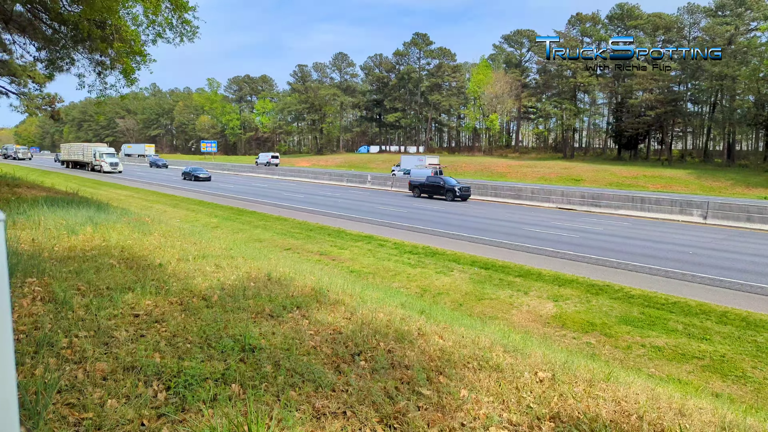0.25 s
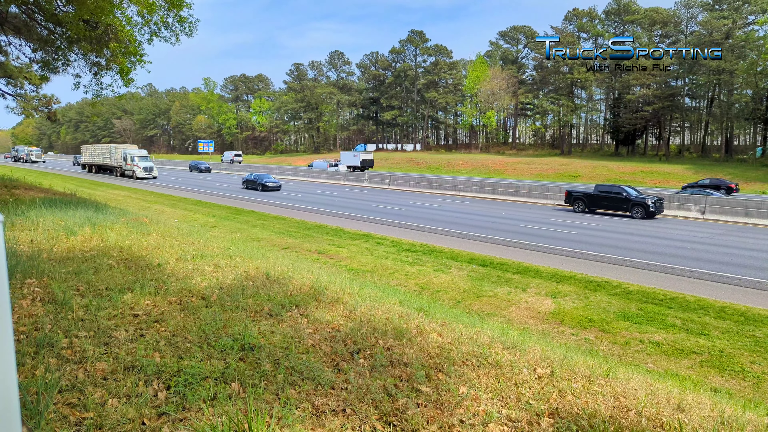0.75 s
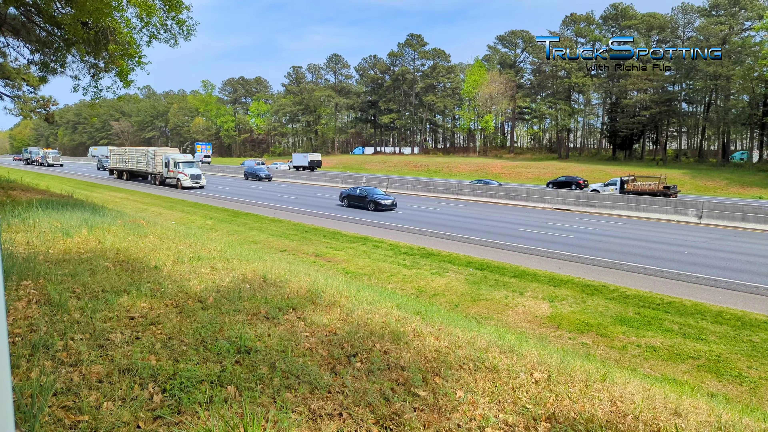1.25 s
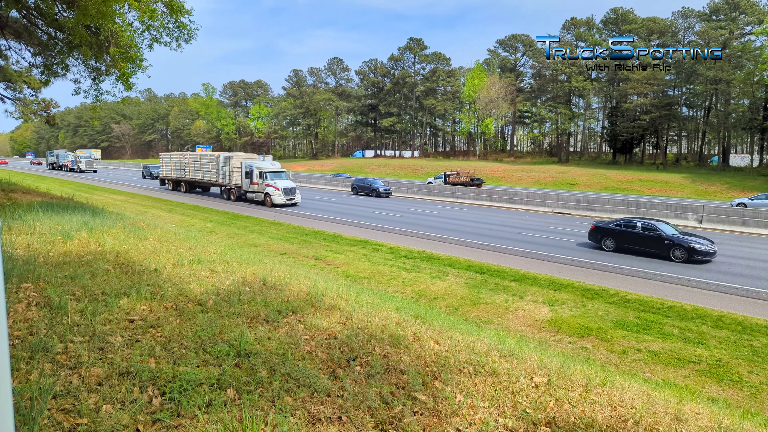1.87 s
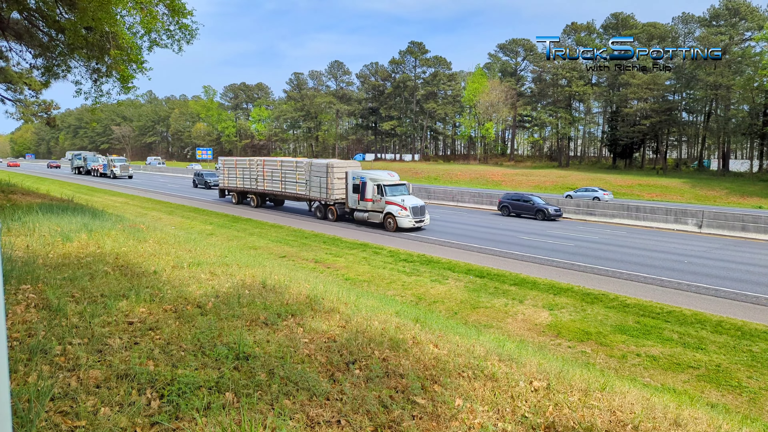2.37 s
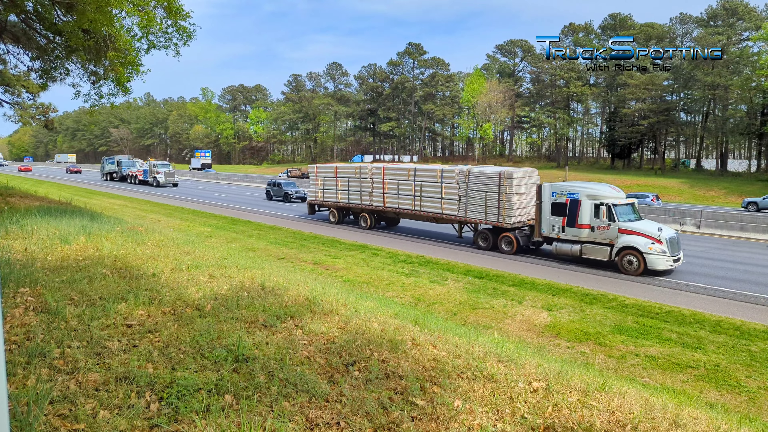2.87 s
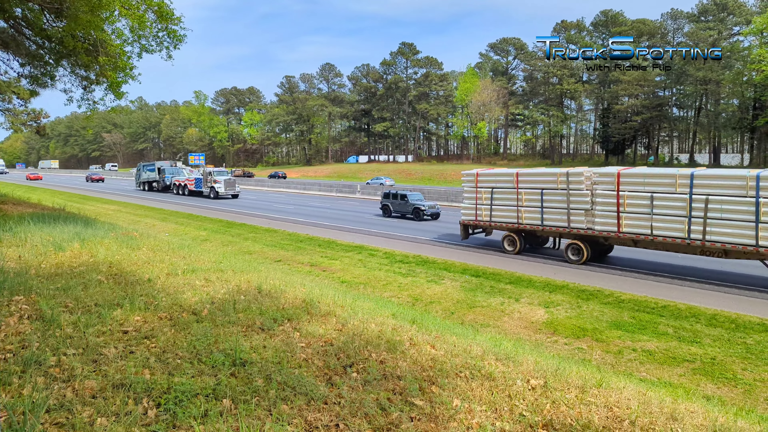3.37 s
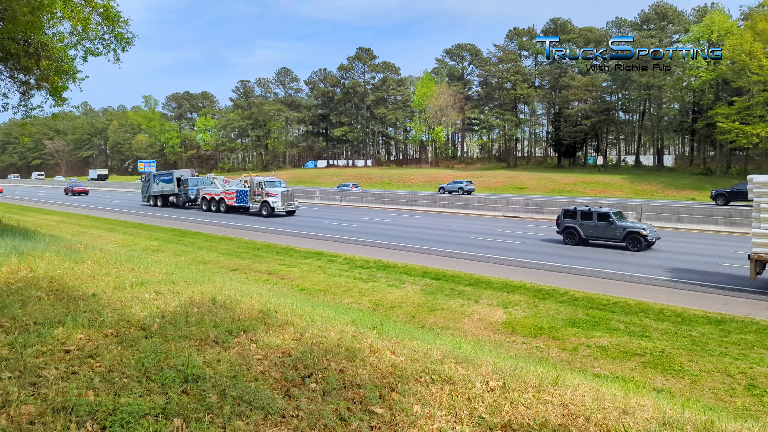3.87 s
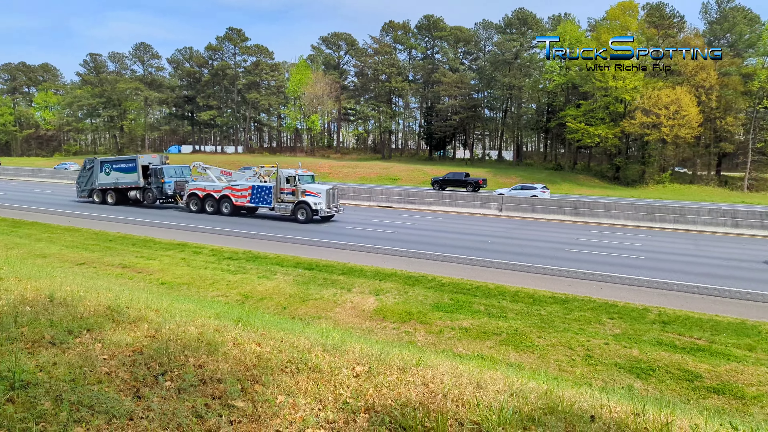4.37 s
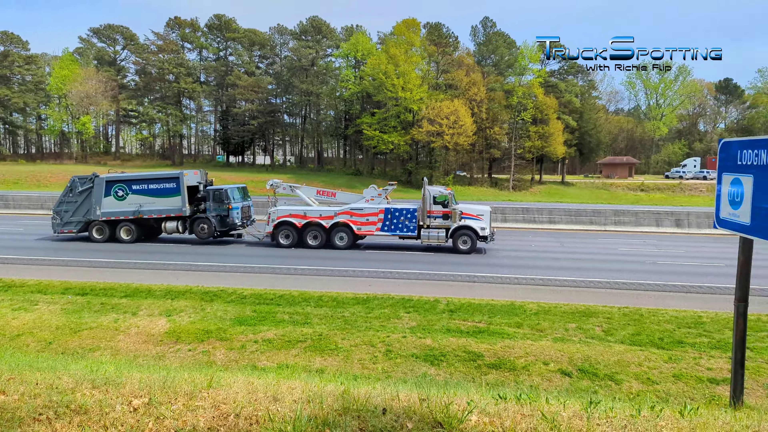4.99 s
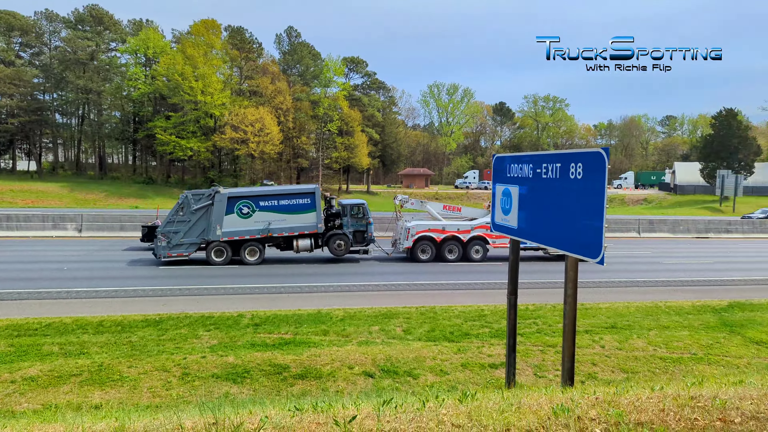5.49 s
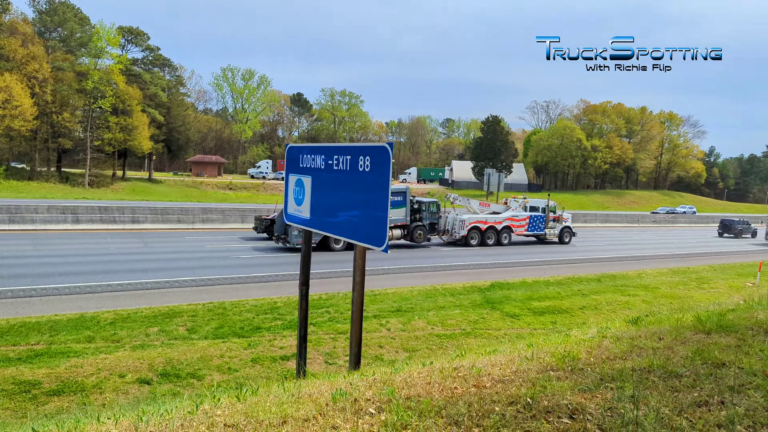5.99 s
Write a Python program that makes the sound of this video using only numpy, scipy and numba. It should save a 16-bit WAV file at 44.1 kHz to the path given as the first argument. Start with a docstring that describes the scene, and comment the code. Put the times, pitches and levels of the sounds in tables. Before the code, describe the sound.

A stereo microphone stands on an open grass verge beside a highway. Low, wavering wake rumble and tyre noise run throughout. A car rolls by at the start under a faint, very high whistle; from about 0.27 to 0.38 seconds the sound cuts out completely. Cars and a pickup then pass around 0.5 to 1.7 seconds, with soft sinking tyre bands and a low engine drone that beats, the throb quickening towards 3 seconds. At about 3.2 seconds a diesel tractor-trailer bursts in close: quick axle whooshes, sprays of fine grit, a deep uneven hum and its octave. Rough, brief exhaust tones rasp around 3.8 to 4.3 seconds. Heavy tyre roar peaks again between 4.2 and 5.2 under a thin high hiss, while the diesel hum fades. A tow truck's tyres whine, strongest near 5.5 and sliding down in pitch, as roar and rumble recede towards 6.2 seconds.

```python
"""Highway traffic heard from a grass verge, as axle swells of coloured tyre noise over low wake rumble.
A faint whistle comes first, then the sound drops out for a tenth of a second and cars roll past.
A pickup's drone beats against a second, weaker engine; tread grooves ring as sinking noise bands.
A diesel tractor-trailer passes close, a shaken harmonic series with sprays of grit and brief rough tones.
Heavy trucks follow under a thin, high hiss; a tow truck's tyres whine on a Doppler-shifted tone."""
import sys
import numpy as np
from scipy import signal
from scipy.fft import rfft, irfft, next_fast_len
from scipy.io import wavfile
from scipy.ndimage import uniform_filter1d, minimum_filter1d, map_coordinates
from numba import njit

SR = 44100
rng = np.random.default_rng(int(sys.argv[2]) if len(sys.argv) > 2 else 0)


def persist_wave(psi):
    """Save psi, clipped to +-1, as 16-bit WAV."""
    counts = np.round(np.clip(psi, -1, 1) * 32767).astype(np.int16)
    wavfile.write(sys.argv[1], SR, np.atleast_2d(counts).T)


N = 275173
TIME = np.arange(N) / SR  # seconds
PADDED = next_fast_len(N, True)
BINS = np.fft.rfftfreq(PADDED, 1 / SR)  # hertz

# Deep hum of the tractor-trailer's exhaust. Each row: time in seconds, level in dB.
SEMI_HUM = [(2.85, -32), (3.08, -27), (3.2, -13), (3.3, -13), (3.36, -17), (3.44, -7), (3.54, -12),
            (3.6, -13), (3.66, -12.5), (3.78, -19), (3.94, -11.5), (4.01, -14.5), (4.07, -9), (4.22, -10),
            (4.3, -27), (4.35, -15.5), (4.44, -8), (4.49, -18.5), (4.56, -13.5), (4.64, -28), (4.75, -33.5),
            (4.92, -20), (5.1, -24.5), (5.4, -25), (5.66, -41), (5.84, -32), (6.04, -21), (6.24, -28)]


def undb(db):
    """Level: every 20 dB multiplies the amplitude by ten."""
    return 10 ** (np.asarray(db) / 20)


def unit(x):
    """Normalization: scale to rms 1."""
    return x / np.sqrt(np.mean(x ** 2))


def curves(table):
    """Linear interpolation: each column of a timed table, sample by sample."""
    seconds, *columns = np.transpose(table)
    return [np.interp(TIME, seconds, column) for column in columns]


def present(table, fade=0.18):
    """Gating: 1 while a table lasts, fading linearly to 0 over fade seconds before and after."""
    outside = np.minimum(TIME - table[0][0], table[-1][0] - TIME)
    return np.clip(1 + outside / fade, 0, 1)


def across(points):
    """Spectral interpolation: a table of hertz and value, on every bin along a log-frequency axis."""
    hz, value = np.transpose(points)
    return np.interp(np.log(BINS + 1), np.log(hz), value)


def walk(rate):
    """Random modulation: levels held 1 / rate seconds, then smoothed twice; spread near 1."""
    hold = max(int(SR / rate), 2)
    steps = np.repeat(rng.standard_normal(N // hold + 1), hold)
    return 1.48 * uniform_filter1d(uniform_filter1d(steps, hold), hold)[:N]


def rush(colour):
    """Partial coherence: coloured stereo noise, alike in the bass, more diffuse in the treble; mid rms 1."""
    # Each row: frequency in hertz, share of the power common to both ports.
    likeness = [(25, 0.97), (60, 0.98), (130, 1), (280, 0.97), (550, 0.88), (1000, 0.9), (2000, 0.71),
                (4000, 0.67), (8000, 0.19)]
    noise = rfft(rng.standard_normal((3, PADDED)))
    common = np.clip(across(likeness), 0, 1)
    pair = np.sqrt(common) * noise[0] + np.sqrt(1 - common) * noise[1:]
    x = irfft(pair * undb(across(colour)), PADDED)[:, :N]
    return x / np.std(x.mean(axis=0))


def panned(db, pan_db):
    """Level difference: left and right gains, pan_db being left minus right."""
    return undb(db + np.array([pan_db, -pan_db]) / 2)


def swell(closest_s, half_s):
    """Inverse-square spreading: gain 1 at the closest point, a half at half_s before and after."""
    return 1 / (1 + ((TIME - closest_s) / half_s) ** 2)


def bell(loudest_s, half_s):
    """Gaussian envelope: gain 1 at its loudest, a half at half_s before and after."""
    return .5 ** (((TIME - loudest_s) / half_s) ** 2)


def doppler(closest_s, sweep_s, speed=24.5):
    """Doppler effect: pitch factor at speed m/s; sweep_s is the passing distance over the speed."""
    along = (TIME - closest_s) / sweep_s
    mach = speed / 343  # speed of sound in m/s
    return 1 - mach * along / np.hypot(1, along)


def turning(hz):
    """Phase accumulation: radians of something that repeats hz times a second."""
    return 2 * np.pi * (np.cumsum(hz) / SR + rng.random())


def firing_phase(hz, closest_s, sweep_s, speed):
    """Doppler effect and phase jitter: firings of a passing engine sink in rate and come unevenly."""
    jitter = .07  # radians
    return turning(hz * doppler(closest_s, sweep_s, speed)) + jitter * walk(45)


def partials(phase, orders, flutter, flutter_hz):
    """Harmonic series: multiples of a phase at rms levels in dB; moving air shakes size and timing."""
    out = 0
    for multiple, db in orders:
        shake = 1 + flutter * (walk(flutter_hz) + 1j * walk(flutter_hz))
        angle = multiple * phase + 2 * np.pi * rng.random()
        out = out + undb(db) * np.real(shake * np.exp(1j * angle))
    return out * np.sqrt(2 / (1 + 2 * flutter ** 2))


def blurred(hz, blur, blur_hz):
    """Sideband modulation: a tone of rms 1, part of its energy smeared into a band around it."""
    smear = 1 + blur * (walk(blur_hz) + 1j * walk(blur_hz))
    tone = np.real(smear * np.exp(1j * turning(hz)))
    return tone * np.sqrt(2 / (1 + 2 * blur ** 2))


@njit
def band(x, hz, width):
    """Resonance: a state-variable band-pass with a moving centre, gain 1 there."""
    y, band_state, low_state = np.empty(len(x)), 0., 0.
    for i in range(len(x)):
        g, damping = np.tan(np.pi * hz[i] / SR), width[i] / hz[i]
        v = (band_state + g * (x[i] - low_state)) / (1 + g * (g + damping))
        band_state = 2 * v - band_state
        low_state = low_state + 2 * g * v
        y[i] = damping * v
    return y


def tyre_level(reference_db, slope, axle_db, bright_slope):
    """Incoherent addition: powers of the traffic stream and of each axle's swell sum to a level in dB."""
    # How near the stream is. Each row: time in seconds, nearness in dB about a reference.
    nearness = [(.4, -12), (1.1, -12), (1.6, -8.5), (2.8, -7), (3.25, -3.5), (3.6, -4), (4.3, 1.5),
                (5.15, 1), (5.7, -2.5), (6.24, -4)]
    # Axles rolling by. Each row: time closest in seconds, half duration in seconds,
    # level in dB before axle_db and brightness act, brightness in dB.
    axles = [(0.047, 0.13, -28.5, -3.5), (0.467, 0.14, -43.5, 5.5), (.66, 0.25, -33, -2),
             (1.56, 0.22, -46, 4), (3.29, 0.032, -24.5, 1.5), (3.382, 0.089, -20, -1),
             (3.475, 0.063, -33, 6), (3.55, 0.049, -26, 3), (3.638, 0.029, -20, 1), (3.798, 0.12, -20, 2.5),
             (3.992, 0.11, -19, -2.5), (4.268, 0.13, -20, 0), (4.358, .05, -26, -0.5),
             (4.566, 0.049, -34.5, 3), (4.756, 0.071, -24.5, 0.5), (4.967, 0.12, -26.5, 2.5),
             (5.135, .06, -43, -3), (5.383, 0.1, -25, -2.5)]
    rise_share = 0.59  # an axle comes up in this share of its half duration and leaves more slowly
    near_db, = curves(nearness)
    power = undb(reference_db + slope * near_db) ** 2
    for closest_s, half_s, db, bright_db in axles:
        shape = swell(closest_s, half_s * np.where(TIME < closest_s, rise_share, 1))
        power = power + (undb(db + axle_db + bright_slope * bright_db) * shape) ** 2
    return 10 * np.log10(power)


def tyres(firing):
    """Broadband radiation: casings drone, treads roar, squeezed air hisses; diesel knock pulses the hiss."""
    # Noise spectra. Each row: frequency in hertz, relative level in dB per hertz.
    casing_colour = [(60, -12), (130, -0.5), (200, 3), (260, -4.5), (340, -1.5), (450, -3), (600, 1),
                     (900, -28), (2000, -56)]
    roar_colour = [(250, -18), (450, -10), (600, -1), (800, 1.5), (1000, -0.5), (1300, -6.5), (1700, -13),
                   (2500, -34.5), (5000, -59), (11000, -79)]
    hiss_colour = [(700, -45), (1300, 2.5), (1700, -1.5), (2300, 0), (3200, -4), (4400, -10), (5800, -22),
                   (9000, -38), (12000, -64)]
    sizzle_colour = [(2500, -21), (4500, 4), (6000, 1), (8000, 0), (9500, -2.5), (10400, -9), (11300, -18),
                     (15000, -44)]
    # How each sound answers: level at 0 dB nearness in dB, dB per dB of nearness,
    # offset for an axle in dB, dB per dB of axle brightness.
    casing_law = (-24, 1.11, -1, 0.5)
    roar_law = (-23, 0.4, -1.5, -0.5)
    hiss_law = (-31, 1.06, -10, 2)
    sizzle_law = (-43, 1.59, -22, 1.5)
    # Each row: time in seconds, left minus right in dB of roar, of hiss and of sizzle.
    bearing = [(0.0, 0, -1.5, 8.3), (1.8, -2, -3.5, 9.6), (3.2, -1.5, -5, 4.1), (4.2, 2.5, -4.5, 1.7),
               (6.24, 1, -4.5, 1.4)]
    roar_pan, hiss_pan, sizzle_pan = curves(bearing)
    casing_db = tyre_level(*casing_law) + 1.0 * walk(20)
    roar_db = tyre_level(*roar_law) + 0.44 * walk(22.08)
    hiss_db = tyre_level(*hiss_law) + 0.74 * walk(24.82)
    sizzle_db = tyre_level(*sizzle_law) + 0.82 * walk(27)
    casing = undb(casing_db) * rush(casing_colour)
    roar = panned(roar_db, roar_pan) * rush(roar_colour)
    hiss = panned(hiss_db, hiss_pan) * rush(hiss_colour)
    sizzle = panned(sizzle_db, sizzle_pan) * rush(sizzle_colour)
    # one pulse a firing while the diesel is heard
    knock = 1 + 0.13 * present(SEMI_HUM, fade=0.29) * np.cos(firing)
    return casing + roar + knock * (hiss + sizzle)


def air():
    """Turbulence: the vehicles' wakes buffet as a low, slowly wavering rumble."""
    # Each row: time in seconds, level in dB before a 2 dB lift.
    stirring = [(0, -30), (.9, -30), (1.4, -33), (2.1, -31.5), (4.0, -30.5), (5.3, -26.5), (6.24, -27)]
    # Each row: frequency in hertz, relative level in dB per hertz.
    air_colour = [(10, -18.5), (22, 0.5), (45, -1), (75, 1), (120, -3), (200, -19), (500, -77)]
    db, = curves(stirring)
    return undb(db + 2.0 + 1.0 * walk(5.25)) * rush(air_colour)


def squeak():
    """Narrow-band noise: a faint, thin whistle high above the traffic swells and fades."""
    # Time loudest in seconds, half duration in seconds, pitch in hertz, level in dB.
    whistle = (.08, .06, 7980., -57)
    loudest_s, half_s, hz, db = whistle
    return undb(db) * bell(loudest_s, half_s) * blurred(np.full(N, hz), blur=1.5, blur_hz=250)


def rough_tones():
    """Sideband modulation: brief, rough, sinking tones, mostly diesel overtones with some tyre singing."""
    # Most are snatches of the tractor-trailer's exhaust overtones. Each row: time loudest in seconds,
    # half duration in seconds, level in dB, pitch in hertz before the Doppler shift.
    snatches = [(0.171, 0.1, -39, 352), (3.779, 0.023, -21, 626), (3.852, .055, -18.5, 658.7),
                (3.893, .045, -22.5, 550), (4.009, .02, -23, 827), (4.051, .04, -22, 631),
                (4.236, .02, -23, 796), (4.335, 0.027, -30, 770)]
    out = 0
    for loudest_s, half_s, db, hz in snatches:
        tone = blurred(hz * doppler(loudest_s, sweep_s=.8), blur=.5, blur_hz=55)
        out = out + undb(db) * bell(loudest_s, half_s) * tone
    return out


def beating():
    """Beats: gain of a note plus a second, weaker engine's that drifts away in pitch; rms 1."""
    # Each row: time in seconds, beats per second.
    beat_rate = [(.9, 5), (1.15, 4), (2.03, 4.7), (2.2, 7.4), (2.47, 9.7), (2.78, 10.1), (3.0, 12.5)]
    dip_s, depth = .825, .6  # time of one trough in seconds; weaker note's relative amplitude
    rate, = curves(beat_rate)
    beats = np.cumsum(rate) / SR
    beats = beats - np.interp(dip_s, TIME, beats)
    return np.abs(1 - depth * np.exp(2j * np.pi * beats)) / np.hypot(1, depth)


def pickup():
    """Interference: a pickup's drone beats against a second, weaker engine; the throb quickens overall."""
    # Each row: time in seconds, level in dB.
    loudness = [(.39, -38), (.53, -27.5), (.73, -25), (.92, -28), (1.14, -28), (1.35, -36), (1.62, -33),
                (1.9, -28), (2.35, -28), (2.6, -30), (3.0, -31), (3.2, -28.5)]
    # Firing rate in hertz, time closest in seconds, distance over speed in seconds, speed in m/s.
    passing = (127.5, .6, 0.3, 21)
    db, = curves(loudness)
    phase = firing_phase(*passing)
    note = partials(phase, [(1, -0.5), (2, -21.5)], flutter=0.19, flutter_hz=20)
    return undb(db) * present(loudness) * beating() * note


def grooves():
    """Pipe resonance: air rings in the tread grooves, a band that swells and sinks by the Doppler effect."""
    # Each row: time closest in seconds, half duration in seconds, pitch in hertz before the
    # Doppler shift, nominal width in hertz, level in dB, left minus right in dB.
    passes = [(0.478, 0.035, 2360, 219, -43, -2), (.64, 0.16, 980, 300, -32.5, -1),
              (.8, 0.18, 1285, 400, -31, 1), (1.684, 0.2, 876, 320, -29.5, -1),
              (2.25, .2, 1020, 300, -34.5, -1), (2.296, .22, 2600, 900, -45, -3),
              (2.85, 0.42, 1730, 600, -38, -2), (3.493, 0.33, 1555, 480, -27.5, -0.5),
              (4.803, 0.24, 963, 450, -22, 0.5), (5.204, 0.16, 1925, 290, -29, -0.5)]
    out = 0
    for closest_s, half_s, hz, width_hz, db, pan_db in passes:
        ring = rng.standard_normal(N)
        centre = hz * doppler(closest_s, sweep_s=0.81)
        for _ in range(2):  # two filters in series, each wider than the nominal width
            ring = band(ring, centre, np.full(N, 1.18 * width_hz))
        out = out + panned(db, pan_db)[:, None] * (unit(ring) * swell(closest_s, half_s))
    return out


def semi():
    """Harmonic series: a six-cylinder diesel's hum, throbbing octave and overtones; also its firing phase."""
    # Its octave throbs unevenly. Each row: time in seconds, level in dB.
    octave_level = [(2.85, -35.5), (3.16, -24), (3.25, -27), (3.38, -12.5), (3.43, -23), (3.47, -16.5),
                    (3.58, -13.5), (3.68, -19.5), (3.75, -15), (3.825, -27.5), (3.9, -13.5), (4.04, -24.5),
                    (4.21, -23), (4.27, -14), (4.36, -29), (4.44, -13), (4.51, -18), (4.57, -24.5),
                    (4.63, -21), (4.73, -18.5), (4.78, -32), (4.83, -19.5), (5.05, -22.5), (5.27, -21.5),
                    (5.33, -29.5), (5.46, -16), (5.57, -21), (5.67, -16.5), (5.83, -26), (5.91, -25.5),
                    (6.07, -21), (6.24, -36)]
    # Rasp, strongest once the stacks point back. Each row: time in seconds, then levels in dB
    # of the third, fourth and fifth harmonics and of the higher overtones together.
    rasp_level = [(3.2, -44, -35, -39, -39), (3.36, -28.5, -37, -36, -35), (3.55, -35, -27.5, -37, -32.5),
                  (3.78, -23.5, -36, -34, -34), (3.89, -35, -23.5, -40, -29), (4.0, -25.5, -32, -25, -33),
                  (4.1, -19, -26.5, -30, -24.5), (4.24, -22, -29.5, -34, -26.5),
                  (4.34, -25.5, -25, -20, -36), (4.45, -36, -29, -35, -38), (4.54, -21, -30, -32, -43),
                  (4.64, -35, -27, -35, -30.5), (4.8, -23, -22, -43, -31.5), (4.98, -25, -19.5, -23, -28.5),
                  (5.13, -20, -25, -24.5, -41), (5.27, -36, -29.5, -36, -34.5),
                  (5.55, -27, -33, -32.5, -31.5), (5.85, -31.5, -35, -37.5, -39),
                  (6.24, -38, -45, -40.5, -36)]
    # Each row: multiple of the firing rate, level in dB relative to the higher overtones' level.
    overtones = [(6, -1), (7, 0.5), (8, 0), (9, 0), (10, -9.5), (11, -11)]
    # Firing rate in hertz, time closest in seconds, distance over speed in seconds, speed in m/s.
    passing = (92.35, 3.97, .45, 24.3)
    hum_db, = curves(SEMI_HUM)
    octave_db, = curves(octave_level)
    *lines_db, over_db = curves(rasp_level)
    phase = firing_phase(*passing)
    hum = undb(hum_db) * partials(phase, [(1, 0)], flutter=0.063, flutter_hz=23.98)
    octave = undb(octave_db) * partials(phase, [(2, 0.0042)], flutter=0.19, flutter_hz=30.05)
    rasp = undb(over_db) * partials(phase, overtones, flutter=.45, flutter_hz=18)
    for multiple, db in enumerate(lines_db, start=3):
        rasp = rasp + undb(db) * partials(phase, [(multiple, 0)], flutter=0.18, flutter_hz=18)
    return (hum + octave) * present(SEMI_HUM) + rasp * present(rasp_level), phase


def grit():
    """Exponential rise and decay: wheels flick up sprays of grit, some brighter than others."""
    # Each row: start in seconds, level in dB before the rise and decay act,
    # rise time in seconds, decay time in seconds, treble tilt in dB per octave.
    sprays = [(3.284, -38.5, .0007, 0.018, 0), (3.32, -51.5, .05, 0.29, 6), (3.51, -39, 0.0015, 0.024, -4),
              (3.615, -48, .02, .07, 2), (3.722, -48, .005, .03, -2), (3.755, -42, .03, .07, -2),
              (3.92, -41, .03, .05, -2), (4.2, -45.5, .03, .35, -13)]
    # Each row: frequency in hertz, relative level in dB per hertz before the tilt.
    grit_colour = [(1500, -32), (4000, -11), (9500, 3), (12000, -2), (15000, -18)]
    pivot_hz = 9000
    patter = undb(1.2 * walk(600))
    out = 0
    for start_s, db, rise_s, decay_s, tilt_db in sprays:
        age = np.maximum(TIME - start_s, 0)
        envelope = (1 - np.exp(-age / rise_s)) * np.exp(-age / decay_s)
        colour = [(hz, level + tilt_db * np.log2(hz / pivot_hz)) for hz, level in grit_colour]
        out = out + undb(db) * envelope * rush(colour)
    return out * patter


def high_hiss():
    """Band-limited noise: a thin, high hiss swells and fades slowly while the trucks pass."""
    # Time loudest in seconds, half duration in seconds, level in dB.
    hiss_swell = (4.7, 0.54, -51.5)
    # Each row: frequency in hertz, relative level in dB per hertz.
    high_colour = [(3500, -35), (6400, -2), (7800, 0), (9000, -5), (10500, -22), (13000, -45)]
    loudest_s, half_s, db = hiss_swell
    return undb(db) * bell(loudest_s, half_s) * rush(high_colour)


def whine():
    """Doppler effect: the tow truck's treads hold a thin note that sinks, with a faint, blurred octave."""
    # Pitch in hertz before the Doppler shift, time closest in seconds, distance over speed in seconds.
    passing = (583.5, 5.4, .57)
    # Each row: time in seconds, level of the note in dB, level of its octave in dB.
    strength = [(4.48, -28, -46), (4.73, -25.5, -33), (4.84, -30, -30), (4.95, -27, -28), (5.1, -22, -32),
                (5.2, -26, -42), (5.38, -21.5, -24), (5.425, -25, -35), (5.47, -13, -28),
                (5.57, -15.5, -31), (5.63, -28, -29.5), (5.75, -24, -31), (5.86, -37, -37),
                (6.0, -33.5, -40), (6.1, -22.5, -34.5), (6.24, -22, -34)]
    rest_hz, closest_s, sweep_s = passing
    note_db, octave_db = curves(strength)
    hz = rest_hz * doppler(closest_s, sweep_s)
    note = undb(note_db) * blurred(hz, blur=.27, blur_hz=28.23)
    octave = undb(octave_db) * blurred(2 * hz, blur=1.4, blur_hz=55.1)
    return present(strength) * (note + octave)


def ports(left, right):
    """Arrival delay and cancellation: the left port hears later; a dip sweeps down each side."""
    # Each row: time in seconds, lag of the left port in samples.
    port_lag = [(0, 3.7), (2.5, 0.96), (3.3, 2.46), (4.1, 4.65), (6.2, 3)]
    # A nearby reflection cancels one band at each port as the microphone turns.
    # Each row: time in seconds, left centre in hertz, right centre in hertz, depth from 0 to 1.
    notches = [(3.2, 9100, 3770, 0.1), (3.75, 8150, 3100, 0.3), (4.6, 3180, 1700, 0.53),
               (5.05, 1700, 1250, 0.36), (5.5, 1120, 850, 0.35), (6.24, 686, 630, 0.31)]
    lag, = curves(port_lag)
    left_hz, right_hz, depth = curves(notches)
    depth = np.clip(depth, 0, 1)
    left = map_coordinates(left, [np.arange(N) - lag], order=5, mode="nearest")
    left = left - depth * band(left, left_hz, 0.6 * left_hz)
    right = right - depth * band(right, right_hz, 0.6 * right_hz)
    return np.array([left, right])


def scene():
    """Superposition: exhausts, tyres and stirred air of all the traffic add up at two microphone ports."""
    diesel, firing = semi()
    exhausts = diesel + pickup() + rough_tones()
    rolling = tyres(firing) + grooves() + whine() + grit()
    left, right = exhausts + rolling + air() + squeak() + high_hiss()
    return ports(left, right)


def limiter(x, ceiling):
    """Gain reduction: both channels turn down smoothly around each peak above the ceiling."""
    room = ceiling / np.maximum(np.abs(x).max(axis=0), ceiling)
    return x * uniform_filter1d(minimum_filter1d(room, size=700), size=700)


def record(dry):
    """Linear filtering and gain: ports are coloured, sound cuts out briefly, peaks and top are limited."""
    # Each row: frequency in hertz, left minus right in dB.
    port_balance = [(60, -1.3), (350, 0.58), (520, -1.5), (900, -1.3), (1400, -2.6), (2200, -1.6),
                    (4000, 0.5), (6000, -1), (13000, 0.7)]
    # Start and end of the dropout in seconds.
    silence = (.2725, .379)
    top_hz = 15400
    balance = undb(np.array([[.5], [-.5]]) * across(port_balance))
    x = irfft(rfft(dry, PADDED) * balance, PADDED)[:, :N]
    sounding = (TIME < silence[0]) | (TIME > silence[1])
    x = x * uniform_filter1d(1. * sounding, size=64)
    x = limiter(x, ceiling=0.79)
    low_pass = signal.ellip(8, .2, 80, top_hz, fs=SR, output="sos")
    return signal.sosfilt(low_pass, x)


dry = scene()
out = record(dry)
persist_wave(out)
```